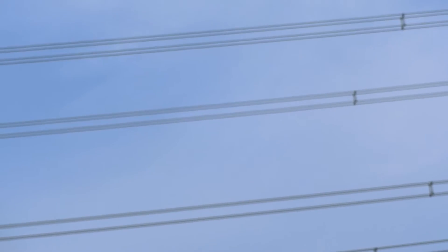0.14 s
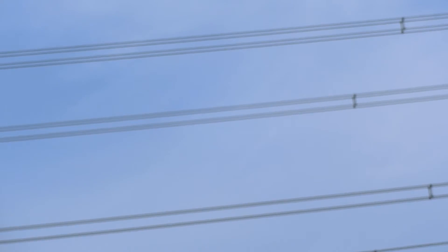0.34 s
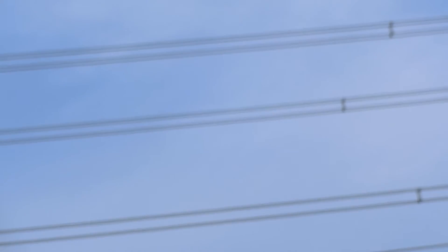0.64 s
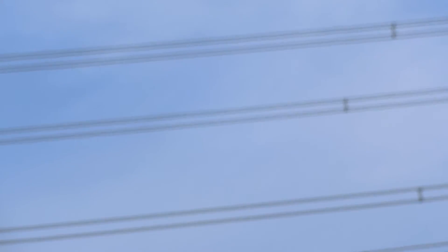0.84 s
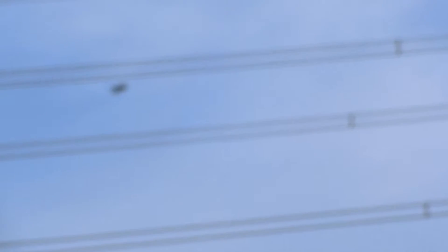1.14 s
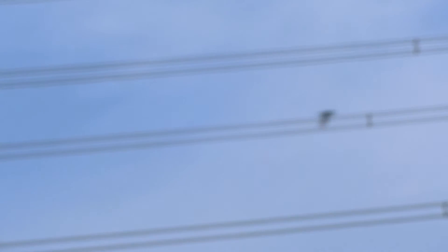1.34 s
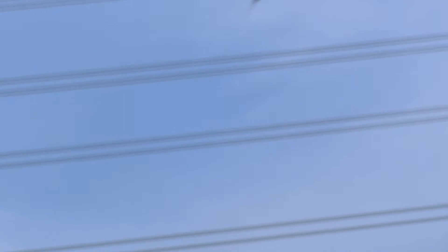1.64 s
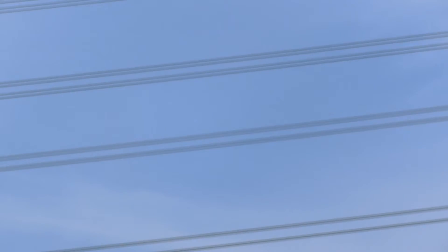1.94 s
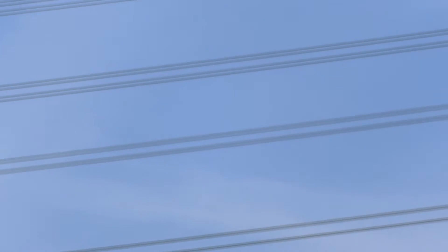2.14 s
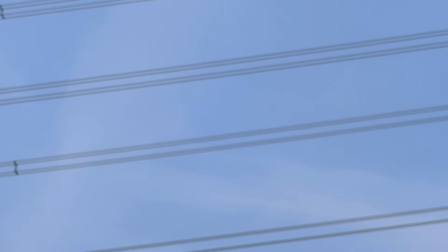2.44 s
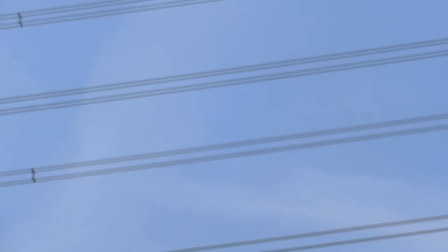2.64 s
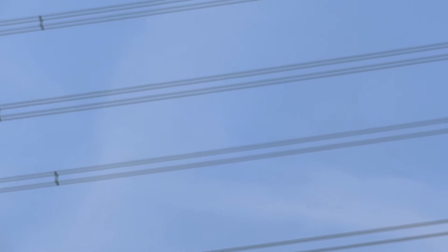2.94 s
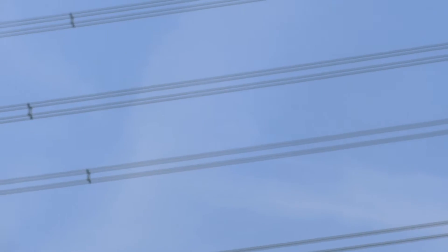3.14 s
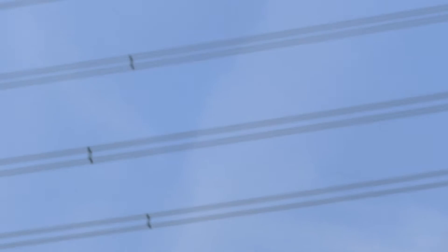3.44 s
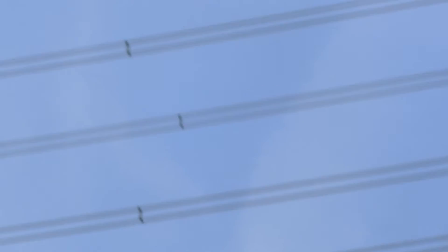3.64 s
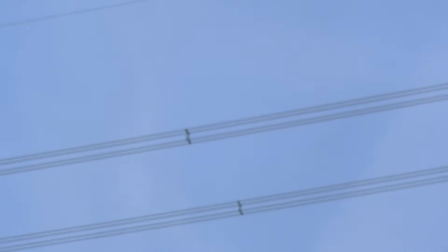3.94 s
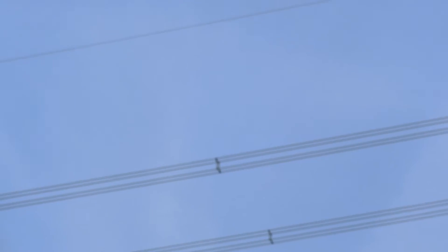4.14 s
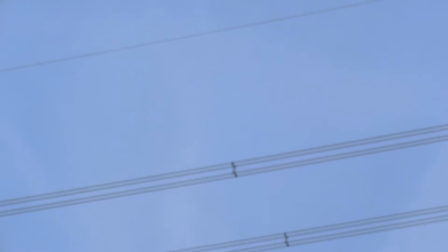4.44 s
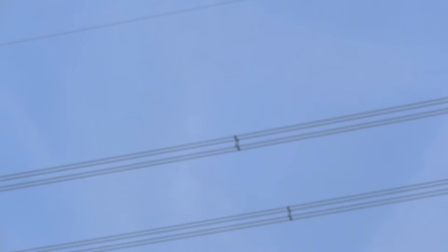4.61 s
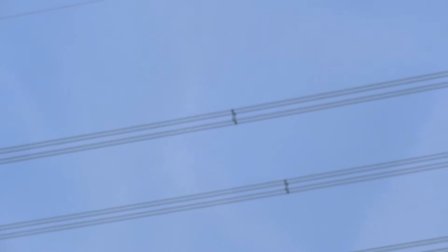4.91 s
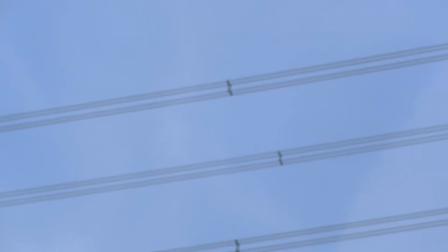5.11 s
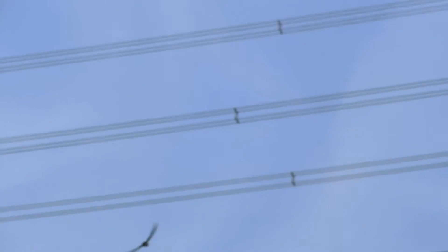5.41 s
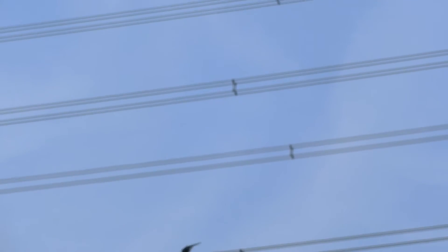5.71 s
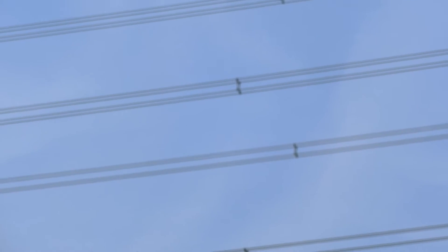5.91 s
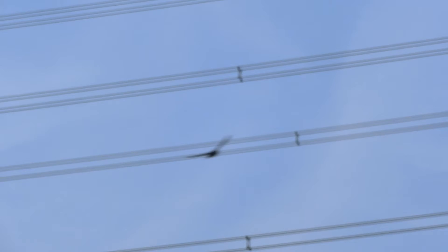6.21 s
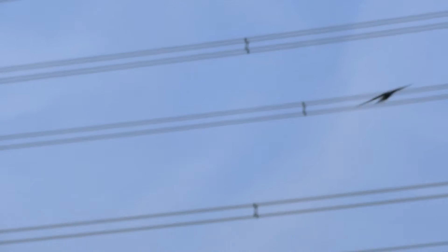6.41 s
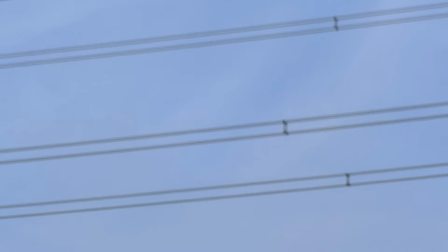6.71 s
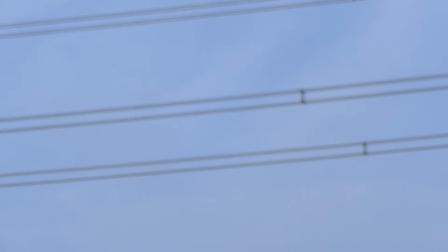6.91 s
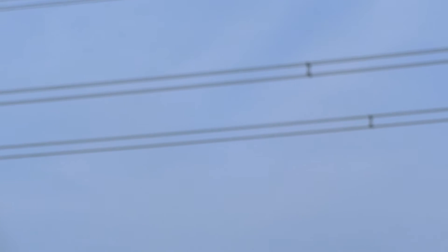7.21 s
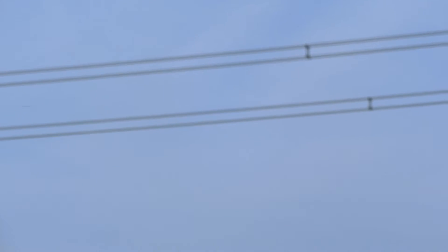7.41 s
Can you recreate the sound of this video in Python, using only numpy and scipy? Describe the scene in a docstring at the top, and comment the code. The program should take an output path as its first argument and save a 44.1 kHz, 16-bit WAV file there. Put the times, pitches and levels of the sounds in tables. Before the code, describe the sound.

Swallows chirp in sharp, scattered twitters, near and far, over a steady thin high insect whine and low distant traffic rumble outdoors.

```python
"""A short swallow call over a thin high insect whine and far traffic, then twittering near and far.
Each call is sung by both sides of the syrinx: two gliding whistles, their overtones and sum tones.
Buildings and ground return the calls as a few reflections and a scattered tail.
Insects and road are shaped noise plus wavering tones; soft low pips and a faint air hiss join them."""
import sys
import numpy as np
from scipy import signal
from scipy.fft import rfft, irfft, next_fast_len
from scipy.io import wavfile
from scipy.ndimage import map_coordinates

SR = 44100
rng = np.random.default_rng(int(sys.argv[2]) if len(sys.argv) > 2 else 0)


def log_audio(samples):
    """Write samples as a 16-bit WAV file to the path given in sys.argv[1]."""
    # one column per channel
    frames = np.atleast_2d(samples).T
    # limit to full scale, then quantise
    limited = np.clip(frames, -1, 1)
    pcm = np.round(limited * 32767).astype(np.int16)
    wavfile.write(sys.argv[1], SR, pcm)


N = 333396
TIME = np.arange(N) / SR

# Call levels below are nominal: before swell, beak and pan.
# Sharp two-step "witt" calls, upper pitch before its climb:
# (time [s], length [s], upper [Hz], lower [Hz], upper level [dB], lower level [dB])
WITT_CALLS = [(-.005, 0.046, 5450, 4250, -47.5, -54.5), (0.752, .085, 5650, 4740, -40, -44),
              (1.369, 0.12, 5640, 4840, -35.5, -38), (2.108, .078, 5650, 4935, -31.5, -36.5),
              (2.648, 0.083, 5670, 5000, -35, -33.5), (2.783, .1, 5470, 4850, -31.5, -33.5),
              (3.373, 0.1, 5390, 4650, -31, -38), (5.28, 0.084, 5260, 4680, -41, -45.5),
              (6.85, 0.1, 5450, 4850, -47, -48)]
# Long held calls: (time [s], length [s], upper [Hz], lower [Hz], upper level [dB], lower level [dB],
# sag of the upper whistle [share of pitch])
HELD_CALLS = [(0.042, .058, 4350, 3630, -46.5, -48.5, 0.0028), (0.222, 0.091, 5990, 4610, -55, -52, 0.013),
              (0.355, 0.12, 6330, 4560, -46, -47.5, 0.15), (0.634, .13, 6350, 4520, -44.5, -45.5, .15),
              (0.722, 0.066, 5590, 4630, -40, -57, 0.046), (0.933, 0.098, 6035, 4485, -42.5, -45, .04),
              (1.536, 0.1, 6630, 4570, -33, -40.5, 0.15), (2.252, .072, 5810, 4254, -44, -47, 0.011),
              (2.373, .08, 5670, 4500, -43, -46.5, 0.0049), (2.94, 0.078, 5800, 4070, -40, -47, 0.091),
              (3.209, 0.09, 5440, 4400, -47, -47, 0.025), (3.817, 0.083, 5420, 4250, -55, -52, 0.004),
              (4.871, 0.098, 6470, 4280, -47.5, -50, 0.25), (4.94, 0.051, 5410, 4230, -50, -55, 0.03),
              (5.949, 0.1, 6120, 4540, -50, -45, 0.048), (6.085, 0.093, 6570, 4580, -39.5, -46.5, 0.17),
              (6.991, 0.097, 6300, 4610, -37, -39, 0.072), (7.07, 0.024, 6420, 4950, -43, -39.5, 0),
              (7.137, 0.098, 6490, 4553, -27.5, -35, 0.16), (7.383, 0.11, 5725, 4460, -30, -35, 0.017),
              (7.523, .062, 5720, 4380, -36, -48, 0.0068)]
# Quick upward sweeps:
# (time [s], length [s], final upper [Hz], final lower [Hz], upper level [dB], lower level [dB])
RISE_CALLS = [(0.217, 0.046, 3900, 3080, -47, -62), (0.277, 0.028, 3880, 2760, -48, -57.5),
              (0.455, 0.03, 7200, 3300, -42.5, -59), (0.587, 0.042, 5600, 3680, -40, -54),
              (0.611, 0.019, 4360, 2510, -44, -59), (0.787, .04, 5340, 3210, -43, -61),
              (0.899, 0.028, 5440, 4300, -47, -61), (1.149, 0.044, 6900, 3840, -47, -61),
              (4.29, 0.035, 6200, 5200, -45.5, -56), (4.368, 0.025, 4830, 3600, -63, -84),
              (4.465, 0.029, 5920, 4200, -53, -69), (4.494, 0.035, 6030, 4340, -58, -72),
              (6.22, .039, 4640, 3600, -58, -71)]
# Short hooked ticks: (time [s], length [s], upper [Hz], lower [Hz], upper level [dB], lower level [dB])
TICK_CALLS = [(0.522, 0.036, 6460, 3230, -43.5, -62), (1.269, .052, 6650, 4050, -41.5, -52.5),
              (2.019, 0.043, 6750, 4270, -38.5, -48.5), (2.307, .036, 5900, 4690, -52, -40.5),
              (2.565, 0.039, 6170, 4040, -35.5, -42.5), (2.698, .045, 6750, 5070, -37.5, -31),
              (2.851, 0.041, 6700, 4450, -37, -45), (3.286, 0.04, 6450, 4350, -37, -43),
              (3.436, 0.031, 6150, 4620, -47, -37.5), (5.204, 0.047, 6510, 4170, -44, -49.5)]
# Chatter bouts of the far birds: (start [s], length [s], upper [Hz], nominal level [dB])
FLOCK_BOUTS = [(.25, 1.35, 4993, -51), (2.197, 1.55, 5960, -52), (3.899, 1.9, 5716, -53),
               (6.097, 1.23, 5530, -66)]
# Soft low notes of another bird: (time [s], mid pitch [Hz], nominal level [dB])
PIP_NOTES = [(.708, 1480, -57), (1.04, 1410, -53), (1.176, 1380, -56.5), (7.117, 1410, -52)]
# Insect loudness, nominal: (time [s], level [dB])
INSECT_LEVEL = [(0, -45.5), (2, -44), (4.5, -42.5), (7.56, -44)]
# Insect band, relative: (frequency [Hz], density [dB per Hz])
INSECT_SPECTRUM = [(5000, -44), (6500, -18.5), (7300, -11.5), (7900, -3.5), (8200, -3.5), (8550, -1.5),
                   (9100, -7), (9800, -17), (11000, -32), (15000, -54.5)]
# Thin insect tones: (frequency [Hz], nominal level [dB])
INSECT_TONES = [(7537, -68), (7892, -62), (8123, -64), (8506, -63), (8732, -64), (9033, -68)]
# Road noise, relative: (frequency [Hz], density [dB per Hz])
ROAD_SPECTRUM = [(20, -4), (45, -1), (62, 1.5), (100, -2.5), (160, -7), (250, -7.5), (400, -10),
                 (670, -9.5), (900, -17), (1430, -23), (2600, -27.5), (5000, -52)]
# Deep rumble, relative: (frequency [Hz], density [dB per Hz])
RUMBLE_SPECTRUM = [(15, -25), (28, -43), (34, 10), (38, 11), (43, -11), (52, -29), (80, -63)]
# Left-right correlation of the traffic: (frequency [Hz], likeness [-1 to 1])
TRAFFIC_LIKENESS = [(40, 1), (120, 0.82), (500, 0.96), (1400, 0.73), (2500, 0.75)]
# Far engine tones: (frequency [Hz], nominal peak level [dB], loudest at [s], spread [s])
ENGINE_TONES = [(36.9, -44, 6.93, 0.76), (36.5, -64, 2.3, 1.4), (71.4, -52.5, 0.69, 2.9),
                (63.8, -50.5, 5.2, 0.5), (120.1, -59.5, 3.2, 8.7), (260.2, -60, 1.6, 4),
                (371.3, -59.5, 5.1, 4.7), (557.6, -56, 7.04, 1.5), (725, -55, 4.2, 0.16),
                (723, -58, 6.1, 0.86)]
# Open-air hiss, relative: (frequency [Hz], density [dB per Hz])
AIR_SPECTRUM = [(600, -22), (1800, -6.5), (3500, 1), (6000, 3.5), (11000, 0.5), (15500, -2)]
# Decay of the scattered echo by 60 dB: (frequency [Hz], time [s])
ECHO_DECAY = [(1500, 0.21), (5000, 0.43), (9000, 0.37), (15000, 0.23)]
# Radiation from the beak: (frequency [Hz], gain [dB])
BEAK_GAIN = [(700, -30), (1400, 8.5), (2500, 7.5), (4000, -1), (7000, 0), (10500, 4), (13000, 5),
             (15500, -7)]
# Phase between the microphone ports: (frequency [Hz], lead of the left [rad])
PORT_PHASE = [(6500, 0.091), (8000, -1.2), (15000, -2)]

TOP_HZ = 15600
SCOOP_POWER = 1.6  # the opening scoop slows down as it nears the pitch
UPPER_OFF_DB, LOWER_OFF_DB = 50.5, 54  # loss, times the share by which a whistle lies below its pitch
NEAR_DB, NEAR_ECHO_DB = -28, -6.5  # level of a call from close by; its base echo level re the call
ECHO_GROWS = 0.2  # dB more echo per dB that a call is fainter


def amp(db):
    """Decibels to gain."""
    return 10 ** (np.asarray(db) / 20)


def unit(x):
    """Scaled to rms 1."""
    return x / np.sqrt(np.mean(x ** 2) + 1e-20)


def along(points, hz):
    """(frequency [Hz], value) points read on a log frequency axis."""
    f, v = np.transpose(points)
    return np.interp(np.log(hz + 1), np.log(f + 1), v)


def wobble(rate_hz, size=N):
    """A smooth random curve, rate_hz knots a second."""
    knots = rng.standard_normal(int(size * rate_hz / SR) + 4)
    return map_coordinates(knots, [np.arange(size) * rate_hz / SR])


def filtered(x, response):
    """x times a response of frequency."""
    m = next_fast_len(N + SR // 4)
    return irfft(rfft(x, m) * response(np.fft.rfftfreq(m, 1 / SR)), m)[..., :N]


def add(track, sound, start_s):
    """Mix a stereo sound into the track from start_s, or from 0 if that is negative."""
    start = max(round(start_s * SR), 0)
    part = sound[:, :max(N - start, 0)]
    track[:, start:start + part.shape[1]] += part


def panned(x, left_db):
    """Louder on the left by left_db."""
    return x * amp([[left_db / 2], [-left_db / 2]])


def rush(spectrum, likeness):
    """Coloured stereo noise, mid at rms 1; the side share sets the left-right correlation."""
    def mid_side_gain(hz):
        angle = np.arccos(np.clip(along(likeness, hz), -1, 1)) / 2
        return amp(along(spectrum, hz)) * np.array([np.ones_like(hz), np.tan(angle)])

    mid, side = filtered(rng.standard_normal((2, N)), mid_side_gain)
    return np.array([mid + side, mid - side]) / np.std(mid)


def insects(level_db, drift=.003, width_hz=22):
    """Many stridulating insects merge into one shimmering band; a few thin tones stand out."""
    likeness = [(7000, .35), (8500, 0.89), (11000, .05)]  # (frequency [Hz], likeness)
    chorus = amp(level_db - 2.0 + 0.31 * wobble(25)) * rush(INSECT_SPECTRUM, likeness)
    tone_swell = amp(np.interp(TIME, [3, 4.2, 6, 7.5], [-2, 1, 1, -2]))
    for hz, db in INSECT_TONES:
        pitch_hz = hz * (1 + drift * wobble(0.46)) + width_hz * wobble(60)
        phase = 2 * np.pi * np.cumsum(pitch_hz) / SR
        chorus = chorus + tone_swell * amp(db + 2 * wobble(5.3)) * np.sin(phase)
    return panned(chorus, left_db=4.0)


def traffic(road_db=-47.48, rumble_db=-58, waver=0.00625):
    """Far road noise with a deep rumble and wavering engine tones that come and go."""
    road = amp(road_db) * rush(ROAD_SPECTRUM, TRAFFIC_LIKENESS)
    road = road + amp(rumble_db) * rush(RUMBLE_SPECTRUM, TRAFFIC_LIKENESS)
    for hz, db, peak_s, spread_s in ENGINE_TONES:
        phase = 2 * np.pi * np.cumsum(hz + (1 + waver * hz) * wobble(10)) / SR
        passing = np.exp(-((TIME - peak_s) / spread_s) ** 2 / 2)
        road = road + amp(db + 1.56 * wobble(4.5)) * passing * np.sin(phase)
    return panned(road, left_db=.5)


def open_air():
    """Faint broadband hiss, less alike left and right toward the treble."""
    return amp(-55) * rush(AIR_SPECTRUM, [(1500, 0.88), (5000, 0.71), (12000, 0)])


def glide(u, off_db, scoop, top, fall=0, bend=1):
    """Pitch ratio and dB of one whistle over u = 0..1: scoops up to top, then falls; loudest on pitch."""
    before = np.clip(1 - u / top, 0, 1)
    after = np.clip((u - top) / (1 - top), 0, 1)
    below = scoop * before ** SCOOP_POWER + fall * after ** bend
    return 1 - below, -off_db * below


def witt(u, step=.13, step_from=0.089, step_to=.85, yield_db=9, enter_at=0.31, entry_db=30):
    """The upper whistle snaps onto pitch, then climbs and yields as the lower one sweeps in late."""
    upper, upper_swell = glide(u, UPPER_OFF_DB, scoop=0.249, top=0.0905)
    lower, lower_swell = glide(u, LOWER_OFF_DB, scoop=.62, top=.76, fall=0.031)
    stepped = np.sin(np.pi / 2 * np.clip((u - step_from) / (step_to - step_from), 0, 1)) ** 2
    waiting = np.clip(1 - u / enter_at, 0, 1)
    upper = upper * (1 + step * stepped)
    return upper, lower, upper_swell - yield_db * stepped, lower_swell - entry_db * waiting


def held(u, sag, crescendo_db=8.0, enter_at=0.48, entry_db=4):
    """The upper whistle peaks first, then sags while growing; the lower one fades in and holds."""
    upper, upper_swell = glide(u, UPPER_OFF_DB, scoop=.28, top=.32, fall=sag)
    lower, lower_swell = glide(u, LOWER_OFF_DB, scoop=.31, top=.52, fall=0.029, bend=3.15)
    waiting = np.clip(1 - u / enter_at, 0, 1)
    return upper, lower, upper_swell + crescendo_db * (u - .5), lower_swell - entry_db * waiting


def rise(u, scoop=.34, bend=1.3, loud_at=0.75, taper_db=33):
    """Both whistles sweep up together, swelling and fading."""
    ratio = 1 - scoop * (1 - u ** bend)
    swell = -taper_db * (u - loud_at) ** 2
    return ratio, ratio, swell, swell


def tick(u, crescendo_db=23, nominal_at=0.65):
    """Both whistles rise briefly and hook downward, the upper one gaining force on the way."""
    upper, upper_swell = glide(u, UPPER_OFF_DB, scoop=0.1155, top=0.304, fall=0.263, bend=3.02)
    lower, lower_swell = glide(u, LOWER_OFF_DB, scoop=.24, top=0.5, fall=0.168, bend=2.8)
    return upper, lower, upper_swell + crescendo_db * (u - nominal_at), lower_swell


def syrinx(shape, length_s, upper_hz, lower_hz, upper_db, lower_db, rough):
    """Two whistles glide through one shape; the lower chops the airflow, breeding overtones and sums."""
    sum_db, double_db, third_db, rasp_db = -10, -14, -17, -19
    jitter, flutter_db, edge_s = .005, 1.4, 0.0023  # rough scales jitter [share of pitch] and flutter
    size = int(length_s * SR)
    u = np.linspace(0, 1, size)
    upper, lower, upper_swell, lower_swell = shape(u)

    def turning(hz):
        jittered_hz = hz * (1 + rough * jitter * wobble(500.3, size))
        return np.exp(2j * np.pi * np.cumsum(jittered_hz) / SR)

    high, low = turning(upper_hz * upper), turning(lower_hz * lower)
    high_gain = amp(upper_db + upper_swell + rough * flutter_db * wobble(211.5, size))
    low_gain = amp(lower_db + lower_swell + rough * flutter_db * wobble(196, size))
    both = np.sqrt(high_gain * low_gain)
    # products of the phasors sound at the sums of their frequencies
    tone = high_gain * high + low_gain * low + amp(sum_db) * both * high * low
    tone += amp(double_db) * (low_gain * low ** 2 + amp(-6.0) * high_gain * high ** 2)
    tone += amp(third_db) * (low_gain * low ** 3 + both * high * low ** 2)
    # uneven closing of the membranes adds a scratch between the overtones
    band = signal.butter(2, [8000, 15000], "bandpass", fs=SR, output="sos")
    scratch = signal.sosfilt(band, rng.standard_normal(size))
    gate = np.sin(np.pi / 2 * np.clip(np.minimum(u, 1 - u) * length_s / edge_s, 0, 1)) ** 2
    return gate * (np.sqrt(2) * tone.imag + amp(rasp_db) * both * unit(scratch))


def echo(x, buildup_s=0.0052, side_share=0.34):
    """Scattered answer of the surroundings: decaying noise, drawn anew at each use, convolved with x."""
    hz, t, z = signal.stft(rng.standard_normal((2, SR // 2)), SR, nperseg=256)
    decay = amp(-60 * t / along(ECHO_DECAY, hz)[:, None])
    buildup = 1 - np.exp(-t / buildup_s)
    mid, side = signal.istft(z * decay * buildup, SR, nperseg=256)[1]
    tail = np.array([mid + side_share * side, mid - side_share * side]) / np.linalg.norm(mid)
    return signal.fftconvolve(x[None], tail, axes=1)


def swallows(walls=3, wall_db=-8):
    """The near birds: every call arrives directly, off a few near walls, then as scattered echo."""
    track = np.zeros((2, N))
    for shape, calls in [(held, HELD_CALLS), (witt, WITT_CALLS), (tick, TICK_CALLS), (rise, RISE_CALLS)]:
        for start_s, length_s, upper_hz, lower_hz, upper_db, lower_db, *sag in calls:
            # the farther the bird, the fainter its call, the more echo it has and the more ragged it arrives
            echo_db = NEAR_ECHO_DB + ECHO_GROWS * (NEAR_DB - max(upper_db, lower_db))
            rough = np.clip(1 + (echo_db + 6) / 3, .5, 1.9)
            call = syrinx(lambda u: shape(u, *sag), length_s, upper_hz, lower_hz, upper_db, lower_db, rough)
            add(track, np.array([call, call]), start_s)
            for path, side in rng.uniform(0, 1, (walls, 2)):
                reflection = amp(echo_db + wall_db) * panned(call, 6 * (side - .5))
                add(track, reflection, start_s + .004 + 0.044 * path)
            add(track, amp(echo_db + 1.5) * echo(call), start_s)
    return panned(track, left_db=2)


def flock(count=54, interval=.76, spread=.19, taper_db=7, direct_db=-2, echo_db=-2.0):
    """Far birds chatter in bouts that swell and fade: chirps at random moments, half lost in echo."""
    track = np.zeros((2, N))
    for bout_s, duration_s, upper_hz, bout_db in FLOCK_BOUTS:
        for k, (when, length, pitch, size) in enumerate(rng.uniform(-1, 1, (count, 4))):
            share = (k + .5 + when) / count  # position within the bout
            hz = upper_hz * (1 + spread * pitch)
            db = bout_db + 3 * size - taper_db * (2 * share - 1) ** 2
            shape = [rise, tick, rise][k % 3]
            chirp = syrinx(shape, .035 + .015 * length, hz, hz * interval, db, db - 7, rough=2.2)
            add(track, np.array([chirp, chirp]), bout_s + share * duration_s)
    return amp(direct_db) * track + amp(echo_db) * echo(track[0])[:, :N]


def pips(length_s=0.017, fall=0.21, echo_db=-7):
    """Soft, low notes: sines falling in pitch under a half-sine envelope, with echo."""
    track = np.zeros((2, N))
    u = np.linspace(0, 1, int(length_s * SR))
    for start_s, hz, db in PIP_NOTES:
        phase = 2 * np.pi * np.cumsum(hz * (1 + fall * (.5 - u))) / SR
        note = amp(db + 4.5) * np.sin(np.pi * u) * np.sin(phase)
        add(track, np.array([note, note]), start_s)
        add(track, amp(echo_db) * echo(note), start_s)
    return track


def scene():
    """Birds over insects, traffic and a faint hiss of open air."""
    insect_db = np.interp(TIME, *np.transpose(INSECT_LEVEL))
    birds = filtered(swallows() + flock(), lambda hz: amp(along(BEAK_GAIN, hz)))
    return birds + pips() + insects(insect_db) + traffic() + open_air()


def record(dry):
    """Two microphone ports differ in treble phase; nothing passes at or above TOP_HZ."""
    def response(hz):
        return (hz < TOP_HZ) * np.exp(.5j * np.outer([1, -1], along(PORT_PHASE, hz)))

    return filtered(dry, response)


dry = scene()
out = record(dry)
log_audio(out)
```